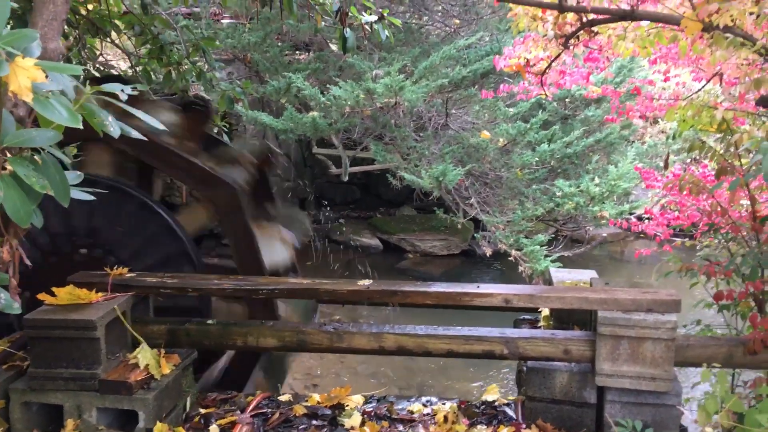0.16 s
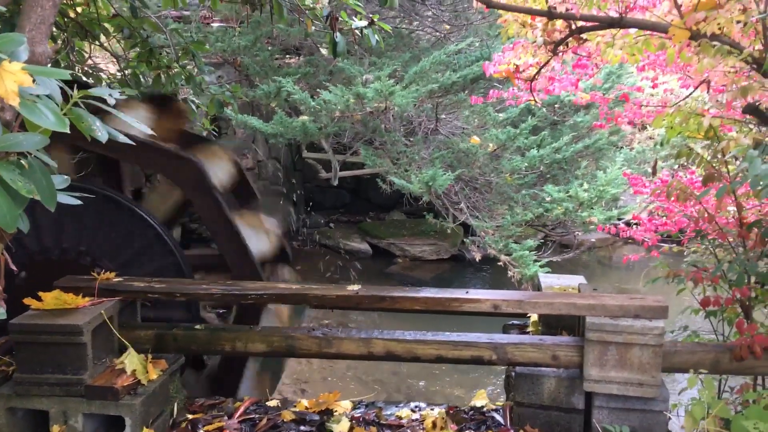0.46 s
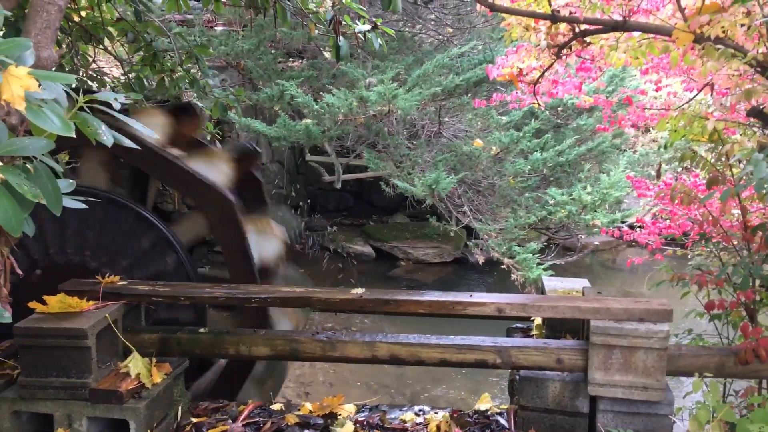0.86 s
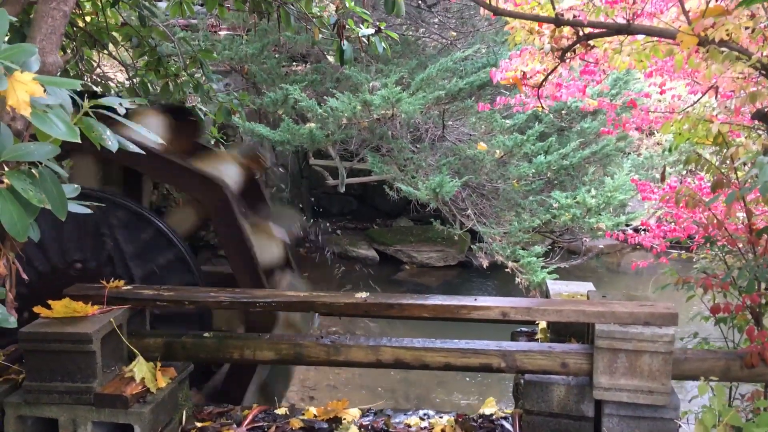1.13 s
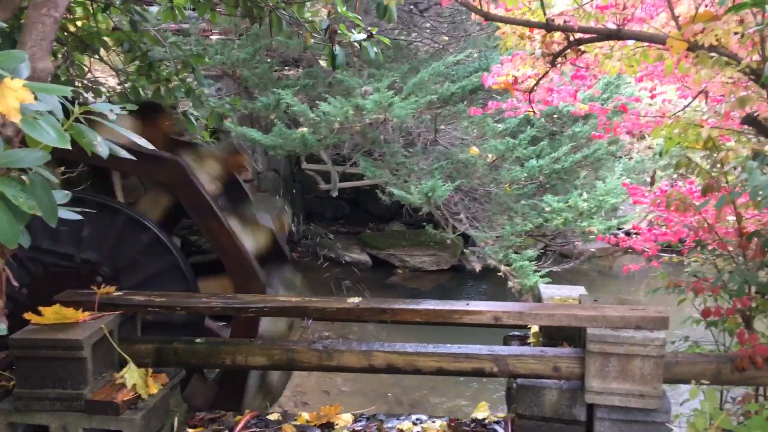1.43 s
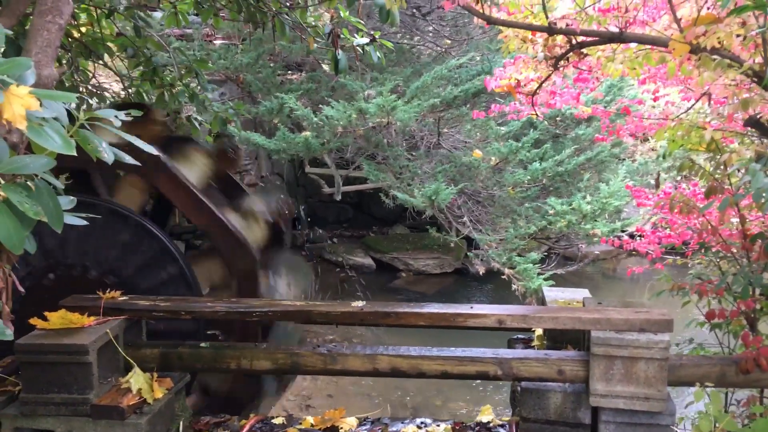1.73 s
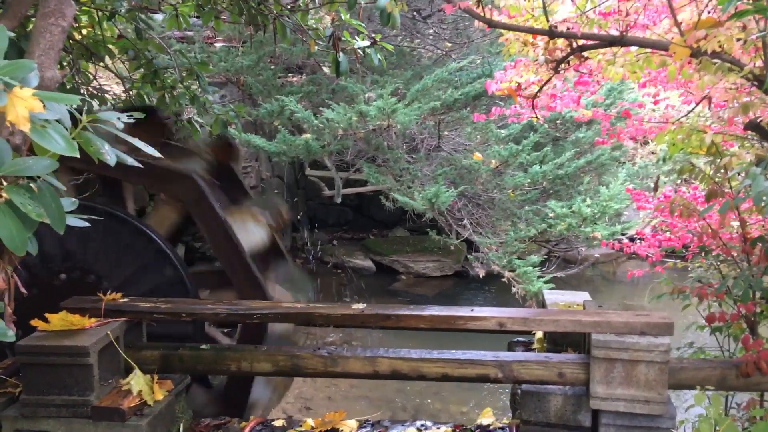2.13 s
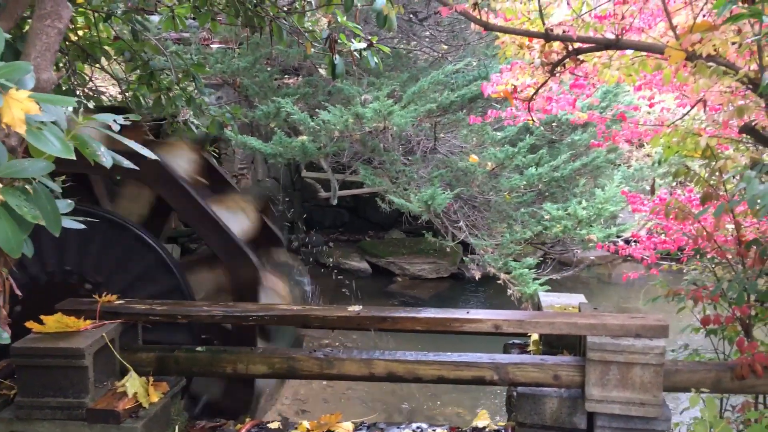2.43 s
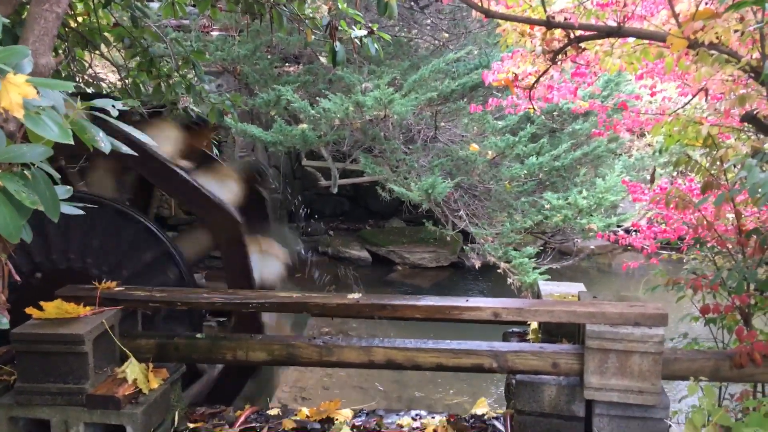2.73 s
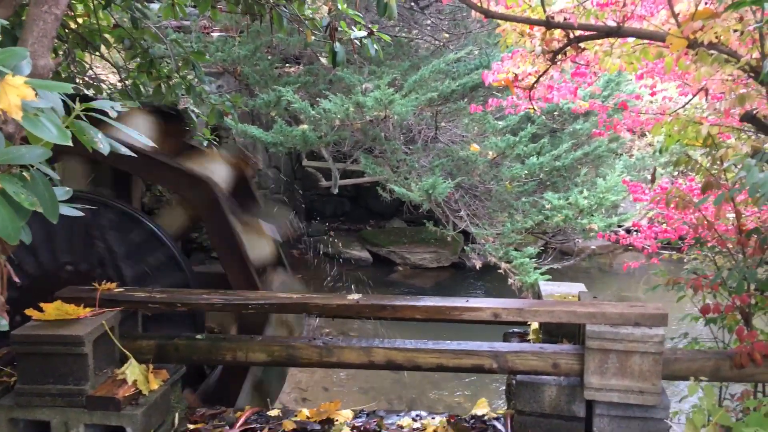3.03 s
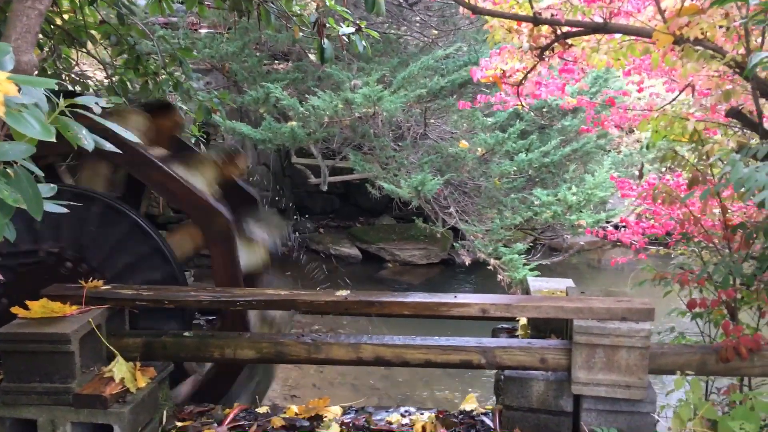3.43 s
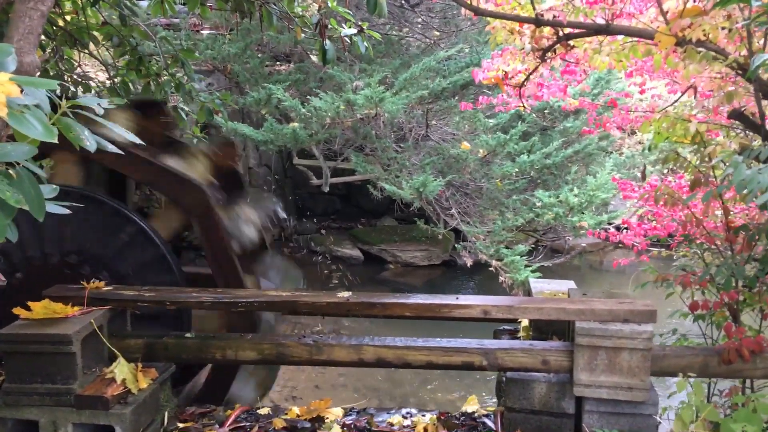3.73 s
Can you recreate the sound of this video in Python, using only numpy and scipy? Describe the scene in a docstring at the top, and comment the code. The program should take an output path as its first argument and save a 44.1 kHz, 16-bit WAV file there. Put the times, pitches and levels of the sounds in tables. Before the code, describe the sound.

A wooden waterwheel spins in a stream, splashing and knocking about seven times a second, with occasional harder clacks; continuous water hiss and low rumble beneath, heard outdoors through one fairly close microphone.

```python
"""At a stream, a wooden waterwheel turns in front of one microphone, about seven knocks a second.
Paddles slap the water (pitched noise), throw bursts of spray (swelling hiss and tiny decaying tones)
and thud through the wheel's timber (ringing modes and a noisy clack); about one knock in seven is hard.
Under it the stream hisses and rumbles (coloured noise), and the wash hums faintly at first."""
import sys
import numpy as np
from scipy import signal
from scipy.fft import rfft, irfft, next_fast_len
from scipy.io import wavfile
from scipy.ndimage import uniform_filter1d

SR = 44100
rng = np.random.default_rng(int(sys.argv[2]) if len(sys.argv) > 2 else 0)


def file_out(sig):
    """Save sig as 16-bit WAV at sys.argv[1]."""
    # one column per channel
    cols = np.atleast_2d(sig).T
    # limit, then scale
    lim = np.clip(cols, -1, 1)
    pcm = np.round(lim * 32767).astype(np.int16)
    wavfile.write(sys.argv[1], SR, pcm)


N = 171108  # samples

# Steady hiss of the stream. Each row: frequency in Hz, relative level in dB.
STREAM_SPECTRUM = [(120, -25), (200, -2), (283, -9.5), (498, -11), (1020, -4.5), (4880, -11), (5860, -6.5),
                   (10500, -9.5), (12600, -7), (15700, -7)]
# Low rumble of the stream. Each row: frequency in Hz, relative level in dB.
RUMBLE_SPECTRUM = [(25, -35), (45, -11), (56, -7), (62, 4), (70, -1.5), (79, 0), (100, -7), (170, -8),
                   (280, -19.5), (400, -22), (520, -40)]
# Loudness of the hiss. Each row: time in seconds, rms level in dB.
STREAM_LEVEL = [(0.0, -35), (0.82, -35.5), (1.21, -35.5), (2.03, -38), (3.63, -38), (3.88, -38)]
# Loudness of the rumble. Each row: time in seconds, rms level in dB.
RUMBLE_LEVEL = [(0.05, -39.5), (0.16, -40), (2.15, -44), (2.27, -39.5), (2.62, -44), (3.88, -46)]
# Loudness of the wash's hum. Each row: time in seconds, level in dB.
HUM_LEVEL = [(0, -60), (.15, -49.5), (.6, -53), (.9, -55), (1.3, -69)]
# Spray thrown by each paddle. Each row: start in seconds, level in dB before the common gain,
# rise in seconds, 60 dB decay in seconds, level of the top treble over the body in dB.
SPRAY_BURSTS = [(0.0105, -18, 0.014, 0.2, -9), (0.1244, -25.5, 0.022, 0.45, -6),
                (0.1694, -23.5, 0.016, 0.28, -0.5), (0.2714, -20.5, 0.023, 0.36, -3),
                (0.3944, -24.5, 0.019, 0.42, -10), (0.4444, -26, 0.015, 0.31, 2.5),
                (0.5444, -24.5, 0.019, 0.41, -4), (0.5774, -24, 0.02, 0.3, -0.5),
                (0.6674, -23, 0.022, 0.62, -8), (0.8034, -22, 0.029, 0.71, -4),
                (0.953, -17, 0.012, 0.25, 2), (1.0744, -27.5, 0.025, 0.45, 1.5),
                (1.1144, -25.5, 0.019, 0.4, -2.5), (1.1994, -23.5, 0.018, 0.34, -9),
                (1.236, -17, 0.009, 0.19, 1), (1.3294, -24.5, 0.015, 0.64, -0.5),
                (1.4714, -24.5, 0.013, 0.51, -7), (1.5144, -25.5, 0.025, 0.75, -1),
                (1.6144, -27, 0.039, 0.64, -0.5), (1.7474, -26, 0.023, 0.53, -4),
                (1.7844, -22.5, 0.023, 0.49, -0.5), (1.903, -21, 0.01, 0.44, 1),
                (2.0244, -26, 0.019, 0.45, -6), (2.0614, -24, 0.015, 0.42, 1.5),
                (2.1674, -22, 0.033, 0.52, -3), (2.2944, -23.5, 0.028, 0.55, -13),
                (2.3414, -27.5, 0.013, 0.45, 4), (2.4294, -24, 0.015, 0.45, -7),
                (2.4734, -26, 0.023, 0.37, 4), (2.562, -23.5, 0.034, 1, -1.5),
                (2.6894, -24, 0.043, 0.31, -8), (2.7244, -25, 0.035, 0.61, 0),
                (2.8454, -23.5, 0.016, 0.7, -1.5), (2.9744, -25, 0.025, 0.87, 1),
                (3.0944, -24.5, 0.023, 0.37, -4), (3.133, -18.5, 0.012, 0.29, -3.5),
                (3.2214, -23.5, 0.019, 0.86, -1), (3.3674, -23, 0.017, 0.26, -2),
                (3.4144, -23.5, 0.013, 0.45, 0.5), (3.5054, -24.5, 0.019, 0.39, 2),
                (3.5694, -27.5, 0.014, 0.35, -1), (3.6494, -25, 0.012, 0.55, -7),
                (3.6834, -26.5, 0.02, 0.78, 3.5), (3.8, -18.5, 0.013, 0.23, -1.5)]
# Colour of the spray's hiss. Each row: frequency in Hz, relative level in dB.
SPRAY_SPECTRUM = [(290, -7.5), (500, -3.5), (738, -5), (1120, -6), (1240, -9), (1660, -5), (4880, -3.5),
                  (12500, -2), (15700, -7.5)]
# Knocks in the timber. Each row: start in seconds, level in dB before the common gain,
# thud, board and knock pitches in Hz, then levels over the thud in dB of the board mode,
# the knock modes, the modes of 0.9-1.7 kHz and those above.
KNOCK_BLOWS = [(0.014, -26, 208, 374, 739, 5, -9, -5, -3.5), (0.157, -33.5, 173, 354, 780, 5, -4, -2, -15),
               (0.299, -33.5, 162, 341, 740, 4, -14, -15, -16),
               (0.43, -36.5, 201, 335, 784, 2.5, -5, -10, -9),
               (0.582, -31, 177, 346, 740, 9.5, -8, -11, -10), (0.704, -33, 181, 347, 740, 4, -10, -8, -4),
               (0.838, -29, 181, 390, 732, 2.5, -7, -15, -8), (0.957, -24, 198, 355, 725, 6, 1, 5.5, 3),
               (1.24, -33.5, 144, 305, 710, -2, 8, 6.5, 10), (1.366, -35, 205, 366, 740, 3.5, -12, -14, -9),
               (1.53, -34, 169, 332, 800, 2.5, -3.5, -14, -16),
               (1.646, -37, 175, 370, 740, 6, -13, -13, -2),
               (1.785, -26.5, 185, 390, 763, -1.5, -7, -19, -11),
               (1.908, -27, 187, 358, 767, 1.5, -13, -3.5, 0.5),
               (2.051, -31.5, 185.6, 348, 740, 0.5, -14, -12, -17),
               (2.195, -33, 161, 348, 780, 8, 0, -9, -16), (2.474, -33, 182, 340, 770, 1, -3, -12, -11),
               (2.597, -36, 170, 337, 744, 7, 2.5, -1, -4), (2.729, -29, 184, 386, 735, -4, -5, -9, -14),
               (2.851, -28, 188.4, 354, 820, 2, 2, -10, -8), (2.999, -35.5, 171, 342, 725, 3, -12, -9, -9),
               (3.137, -29.5, 167, 386, 680, -6, -5.5, -6.5, -9),
               (3.418, -33.5, 191, 317, 673, 9.5, -4, -10, -9), (3.535, -34, 148, 368, 790, 9, -3, -10, -9),
               (3.68, -27.5, 171, 330, 800, -10, -4.5, -7, -18),
               (3.805, -26, 189, 370, 706, 6, -4, -3.5, -1)]
# Modes of the wheel's timber. Each row: untuned frequency in Hz, relative level in dB, 60 dB decay in seconds.
TIMBER_MODES = [(148.2, -5.5, 0.23), (178.2, 2, 0.15), (226.6, -5.5, 0.18), (352, -4, 0.14),
                (737, 7, 0.062), (844, 6.5, 0.029), (912, 5, 0.047), (1040, 2.5, 0.038), (1225, 4, 0.058),
                (1322, -2, 0.097), (1515, -0.5, 0.062), (1906, -2, 0.058), (2270, -1.5, 0.051),
                (2570, 9.5, 0.032)]
# Paddles slapping the water. Each row: start in seconds, level in dB before the common gain,
# centre in Hz, 60 dB decay in seconds, bandwidth as a fraction of the centre.
PADDLE_SLAPS = [(0.1344, -29.5, 2050, 0.11, 0.6), (0.2648, -23, 2670, 0.14, 0.8),
                (0.2805, -23.5, 1890, 0.07, 0.59), (0.4027, -25, 1970, 0.098, 0.58),
                (0.539, -25, 1470, 0.16, 0.97), (0.7008, -32, 1500, 0.25, 0.6),
                (0.8294, -29, 1310, 0.07, 1), (1.084, -27, 1830, 0.12, 0.39),
                (1.325, -32, 1340, 0.22, 0.68), (1.4765, -29.5, 1750, 0.082, 0.52),
                (1.6273, -31, 1210, 0.15, 0.65), (1.749, -33, 1530, 0.13, 0.6),
                (1.8694, -26, 3150, 0.087, 0.49), (2.03, -32, 1430, 0.15, 0.53),
                (2.0646, -29, 2900, 0.13, 0.6), (2.167, -34, 1740, 0.15, 0.6),
                (2.3057, -30, 1540, 0.11, 0.6), (2.472, -32.5, 2710, 0.19, 0.33),
                (2.9818, -28.5, 1220, 0.13, 0.8), (3.1413, -26, 2250, 0.16, 0.35),
                (3.2252, -27, 2150, 0.19, 0.67), (3.3674, -34, 2460, 0.15, 0.6),
                (3.395, -25.5, 1800, 0.064, 0.22), (3.419, -33, 1360, 0.11, 0.6),
                (3.5232, -26.5, 1270, 0.13, 0.5), (3.681, -31, 2280, 0.18, 0.95)]
# Treble dips of the microphone. Each row: centre in Hz, width in Hz, depth from 0 to 1.
MICROPHONE_DIPS = [(4880, 110, 0.52), (7660, 320, 0.44), (10450, 390, 0.49)]

HUM_HZ, HUM_WIDTH_HZ = 909, 60
SPRAY_DB, SPLIT_HZ = -9.5, 9400  # common gain; where the top treble takes over from the body
DROPS_DB, DROP_HZ, DROP_CYCLES = -51, 4430, 1.8  # level, median pitch, cycles to fall by exp(-pi)
DROP_SPREAD_DB, DROP_TOP_DB = 4, 12  # mean of the exponential spread of drop levels, and its cap
THUD_HZ, BOARD_HZ, KNOCK_HZ = 178, 355, 740  # pitches at which the timber's modes stay untuned
CONTACT_S, LOW_LAGS, STAGGER_S = 0.0026, 0.29, 0.00093  # blow length; low modes swell later; uneven starts
DETUNE, SCATTER_DB, RING_DB = 0.0075, 1.5, -3  # random spread of mode pitch and level; common gain
CLACK_DB, CLACK_T60_S = -6, 0.075  # noise of the contact
SLAP_DB, SLAP_RISE_S, CLUMP_DB = -9, 0.003, 6  # common gain, rise, unevenness of a slap's droplets
TOP_HZ = 15720  # band limit of the microphone


def amp(db):
    """Amplitude factor for a level in dB."""
    return 10 ** (np.asarray(db) / 20)


def unit(x):
    """Scale to an rms of 1."""
    return x / np.sqrt(np.mean(x ** 2) + 1e-20)


def curve(rows):
    """Interpolate time and value rows to one value per sample."""
    seconds, values = np.transpose(rows)
    return np.interp(np.arange(N) / SR, seconds, values)


def filtered(x, response):
    """Multiply the spectrum of x by a response of frequency."""
    m = next_fast_len(len(x) + 8192)
    return irfft(rfft(x, m) * response(np.fft.rfftfreq(m, 1 / SR)), m)[:len(x)]


def rush(spectrum, patchy_db):
    """Rushing water: coloured noise of rms 1 with time-frequency patches of random gain."""
    z = signal.stft(rng.standard_normal(N + 512), nperseg=512)[2]
    patches = uniform_filter1d(rng.standard_normal(z.shape), size=8, axis=0)
    patches = uniform_filter1d(patches, size=6, axis=1)
    noise = signal.istft(z * amp(patchy_db * unit(patches)), nperseg=512)[1][:N]
    hz, db = np.transpose(spectrum)
    return unit(filtered(noise, lambda f: amp(np.interp(np.log(f + 1), np.log(hz), db, left=-60))))


def swell(t, rise, t60):
    """A smooth rise to 1, then an exponential decay."""
    rise = max(rise, 1e-3)
    onset = np.sin(np.pi / 2 * np.clip(t / rise, 0, 1))
    return onset * amp(-60 * np.maximum(t - rise, 0) / max(t60, 0.01))


def stream():
    """The stream's hiss and low rumble, two noises with slowly moving levels."""
    hiss = amp(curve(STREAM_LEVEL)) * rush(STREAM_SPECTRUM, patchy_db=1.5)
    rumble = amp(curve(RUMBLE_LEVEL)) * rush(RUMBLE_SPECTRUM, patchy_db=0.16)
    return hiss + rumble


def hum():
    """The wash hums faintly at one pitch, a narrow band of noise, then loses it."""
    w = HUM_WIDTH_HZ
    band = filtered(rng.standard_normal(N), lambda f: w * w / (w * w + 4 * (f - HUM_HZ) ** 2))
    return amp(curve(HUM_LEVEL)) * unit(band)


def drops(count=9000):
    """Tiny bubbles at random times, each a sine that dies within a few cycles; rms 1."""
    draw = rng.random((count, 2))
    u = np.arange(128) / SR
    hz = np.clip(DROP_HZ * np.exp(0.65 * rng.standard_normal(count)), 600, 14000)[:, None]
    size = amp(np.minimum(-DROP_SPREAD_DB * np.log(1 - draw[:, 1:]), DROP_TOP_DB))
    pings = size * np.sin(2 * np.pi * hz * u) * np.exp(-np.pi * hz * u / DROP_CYCLES)
    at = (draw[:, :1] * N).astype(int) + np.arange(128)
    return unit(np.bincount(at.ravel(), pings.ravel(), N + 128)[:N])


def spray():
    """Each paddle's water swells into hiss and tiny bubbles, then dies away."""
    t = np.arange(N) / SR
    powers = np.array([swell(t - start, rise, t60) ** 2 for start, _, rise, t60, _ in SPRAY_BURSTS])
    _, db, _, _, top_db = np.transpose(SPRAY_BURSTS)
    # overlapping bursts add in power
    flow = np.sqrt(amp(db) ** 2 @ powers)
    top_flow = np.sqrt(amp(db + top_db) ** 2 @ powers)
    fizz = drops()
    hiss = rush(SPRAY_SPECTRUM, patchy_db=1.5)
    body = filtered(hiss, lambda f: 1 / (1 + (f / SPLIT_HZ) ** 4))
    top = hiss - body
    return amp(SPRAY_DB) * (flow * body + top_flow * top) + amp(DROPS_DB) * unit(flow) * fizz


def knocks():
    """Blows ring the same timber, tuned by the board struck; hard ones reach the upper modes and clack."""
    out = np.zeros(N + SR)
    t = np.arange(SR // 3) / SR
    hz, level, t60 = (column[:, None] for column in np.transpose(TIMBER_MODES))
    group = np.digitize(hz, [300, 500, 890, 1700])  # thud, board, knock, middle, above
    rise = CONTACT_S * (hz.max() / hz) ** LOW_LAGS
    for start, db, thud_hz, board_hz, knock_hz, board_db, *upper_db in KNOCK_BLOWS:
        z = rng.standard_normal((len(hz), 4))  # per mode: level, pitch, phase, delay
        group_db = np.array([0, board_db, *upper_db])[group]
        gain = amp(level + group_db + SCATTER_DB * z[:, :1] - 60 * t / t60)
        knock_ratio = knock_hz / KNOCK_HZ
        ratios = np.array([thud_hz / THUD_HZ, board_hz / BOARD_HZ, knock_ratio, 1, knock_ratio])
        tuned = hz * ratios[group] * (1 + DETUNE * z[:, 1:2])
        onset = np.clip((t - STAGGER_S * abs(z[:, 3:])) / rise, 0, 1)
        ring = (gain * np.sin(2 * np.pi * tuned * t + z[:, 2:3]) * onset).sum(axis=0)
        # the clack's noise follows the levels of the upper modes
        colour = lambda f: amp(np.interp(f, [450, 800, 1300, 2500, 3000], [-40, *upper_db, -40]))
        clack = filtered(rng.standard_normal(len(t)), colour) * amp(CLACK_DB - 60 * t / CLACK_T60_S)
        blow = ring + clack * np.clip(t / CONTACT_S, 0, 1)
        out[round(start * SR):][:len(t)] += amp(db + RING_DB) * blow
    return out[:N]


def slaps():
    """Each slap is a short, spattering gush of noise resonating around its own pitch."""
    out = np.zeros(N + SR)
    t = np.arange(SR // 4) / SR
    for start, db, hz, t60, width in PADDLE_SLAPS:
        w = hz * max(width, 0.05)
        clumps = np.repeat(rng.standard_normal(len(t) // 64 + 1), 64)[:len(t)]
        spatter = amp(CLUMP_DB * clumps) * rng.standard_normal(len(t))
        band = lambda f: (f * w) ** 2 / ((hz * hz - f * f) ** 2 + (f * w) ** 2)
        gush = unit(filtered(spatter, band))
        out[round(start * SR):][:len(t)] += amp(db + SLAP_DB) * gush * swell(t, SLAP_RISE_S, t60)
    return out[:N]


def scene():
    """Stream and wheel together, the same on both channels."""
    mono = stream() + hum() + spray() + knocks() + slaps()
    return np.tile(mono, (2, 1))


def record(dry):
    """One microphone with three dips in the treble, cut off above its band limit."""
    def mic(f):
        """Product of the dips, zero from the band limit up."""
        dips = [1 - depth / (1 + (2 * (f - hz) / w) ** 2) for hz, w, depth in MICROPHONE_DIPS]
        return np.prod(dips, axis=0) * (f < TOP_HZ)
    return np.array([filtered(channel, mic) for channel in dry])


dry = scene()
out = record(dry)
file_out(out)
```